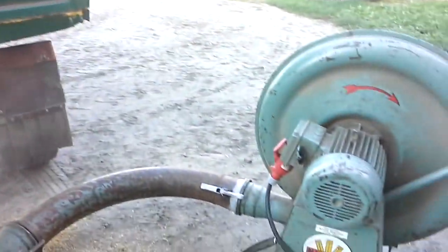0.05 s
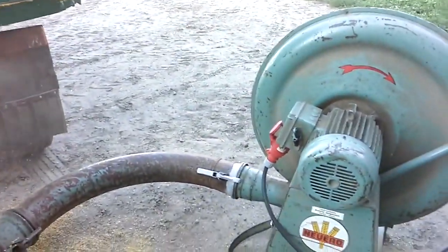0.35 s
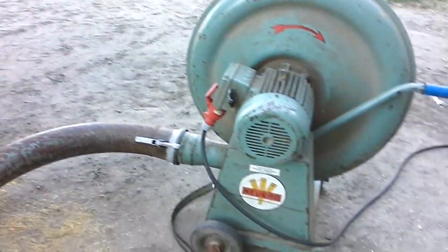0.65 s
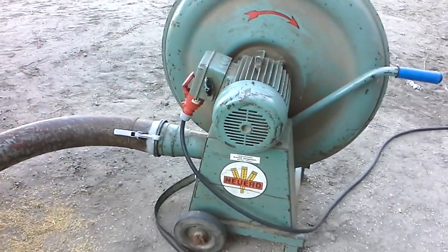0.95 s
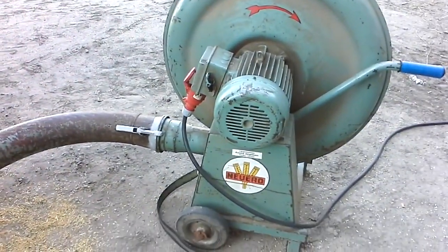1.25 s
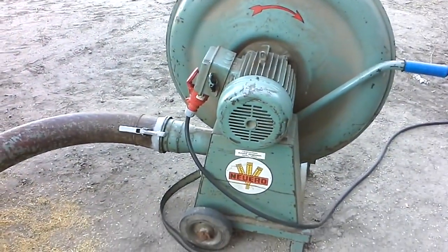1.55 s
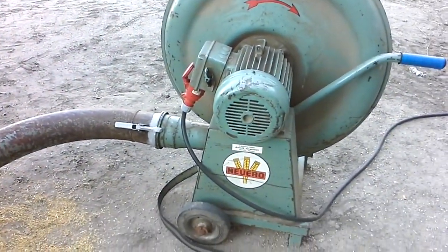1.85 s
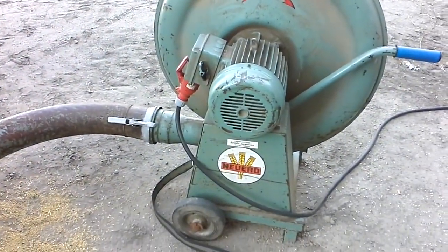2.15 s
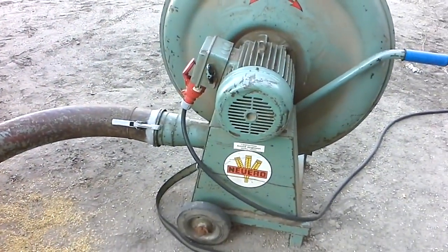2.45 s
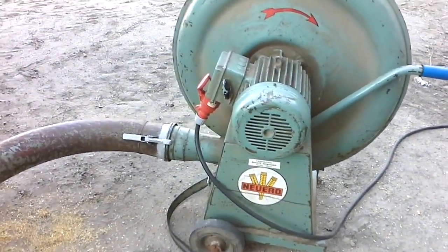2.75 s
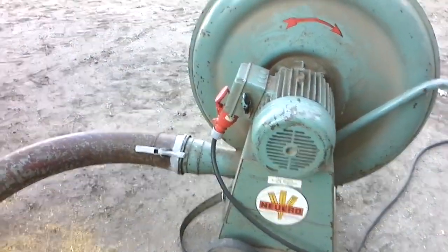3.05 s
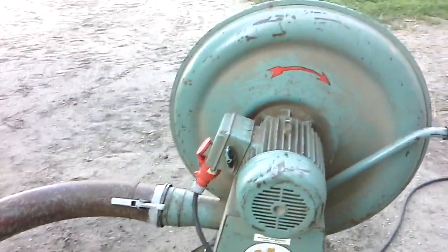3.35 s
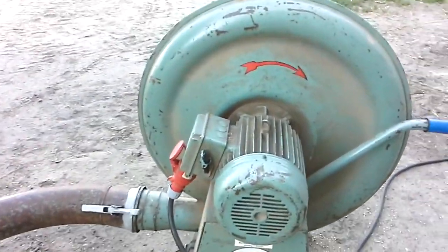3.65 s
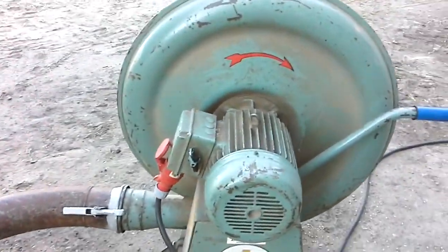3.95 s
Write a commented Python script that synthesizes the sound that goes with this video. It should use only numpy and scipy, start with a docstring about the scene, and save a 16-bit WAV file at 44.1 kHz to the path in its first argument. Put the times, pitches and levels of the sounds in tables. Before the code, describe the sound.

An electric grain blower runs steadily with a shrill whine, low roar and hiss.

```python
"""Grain blower at full speed

Outdoors, an electric grain blower runs close to a hand-held mono microphone. The impeller hums on
multiples of the shaft speed, air roars in the casing and hisses through the steel pipe, whose many narrow
resonances ring as a shrill, restless whine. Near the end the microphone moves in on the motor."""
import sys
import numpy as np
from scipy import signal
from scipy.fft import rfft, irfft, next_fast_len
from scipy.io import wavfile
from scipy.ndimage import uniform_filter1d, map_coordinates

SR = 44100
rng = np.random.default_rng(int(sys.argv[2]) if len(sys.argv) > 2 else 0)


def transcribe(u):
    """Save the signal u as a 16-bit wav file named by the first command-line argument.

    u: samples, shape (n,) or (channels, n), limited to [-1, 1]; the rate is SR.
    q: integer samples, one column per channel.
    """
    v = np.clip(np.atleast_2d(u).T, -1, 1)
    q = np.round(v * 32767).astype(np.int16)
    wavfile.write(sys.argv[1], SR, q)


N = 176400
TIME_S = np.arange(N) / SR


def amp(db):
    """Decibels to gain."""
    return 10 ** (np.asarray(db) / 20)


def unit_rms(x):
    """Scale to rms 1."""
    return x / np.sqrt(np.mean(x ** 2) + 1e-20)


def wobble(rate_hz):
    """A smooth random curve through rate_hz knots a second."""
    return map_coordinates(rng.standard_normal(400), [TIME_S * rate_hz], mode="wrap")


def filtered(x, response):
    """Filter x by a gain given as a function of frequency."""
    size = next_fast_len(N + SR // 4)
    freq_hz = np.fft.rfftfreq(size, 1 / SR)
    return irfft(rfft(x, size) * response(freq_hz), size)[..., :N]


def rushing_air(spectrum, patchy_db):
    """Noise shaped to a spectrum, its level uneven in small patches of time and frequency."""
    bins = signal.stft(rng.standard_normal(N), nperseg=512)[2]
    patches = uniform_filter1d(rng.standard_normal(bins.shape), size=6, axis=0)
    patches = uniform_filter1d(patches, size=14, axis=1)
    noise = signal.istft(bins * amp(patchy_db * unit_rms(patches)), nperseg=512)[1][:N]
    freq_hz, density_db = np.transpose(spectrum)
    shaped = filtered(noise, lambda hz: amp(np.interp(np.log(hz + 1), np.log(freq_hz + 1), density_db)))
    return np.sqrt(SR / 2) * shaped


# Tones of motor and impeller, from beside the blower: shaft_multiple, level_db
HUM_TONES = [(4, -46), (5, -35.5), (6, -35.5), (7, -33.5), (12, -32.5), (13, -45), (15, -40), (11, -44),
             (20, -44.5), (24, -43.5), (28, -45.5), (30, -39), (36, -55)]

def impeller_hum(shaft_hz=48.5, speed_wander=0.00047, flutter_db=1.5):
    """Motor and impeller tones locked to the shaft, each fluttering in the turbulent air."""
    speed_hz = shaft_hz * (1 + speed_wander * wobble(rate_hz=2.955))
    turns = np.cumsum(speed_hz) / SR
    hum = np.zeros(N)
    for shaft_multiple, level_db in HUM_TONES:
        peak = np.sqrt(2) * amp(level_db + flutter_db * wobble(rate_hz=7.07))
        hum += peak * np.sin(2 * np.pi * (shaft_multiple * turns + rng.random()))
    return hum


# Narrow resonances of pipe and casing: pitch_hz, width_hz, level_db, change_at_motor_db
PIPE_RESONANCES = [(3090, 25, -40, 0), (3165, 30, -39, 0), (3760, 40, -38, 0), (3978, 18, -35.5, 0),
                   (4135, 13, -25, 1), (4232, 8, -21.3, -6), (4281, 20, -25.2, -1), (4346, 28, -26.7, 0),
                   (4445, 18, -25.5, 0), (4573, 14, -29.7, 0), (4727, 14, -27.3, -3), (4905, 30, -34.5, 0),
                   (5113, 14, -36, 0), (5346, 11, -30.5, 8), (5475, 9, -22.3, -13), (5528, 24, -28.5, -4),
                   (5595, 20, -34, 0), (5678, 14, -34.5, 2), (5793, 14, -33, -5), (5925, 18, -40, 0),
                   (6078, 18, -37.5, 0), (6262, 30, -36.5, 0), (6680, 40, -37, 0), (6745, 16, -34.5, 5),
                   (6892, 14, -32, -7), (6938, 18, -33.5, -4), (7190, 25, -40, 0), (8460, 50, -37, -3),
                   (10210, 40, -39, 0)]
# Slow swell of the upper whine at the microphone: time_s, gain_db
UPPER_SWELL = [(0, 0), (.9, 0), (1.3, 1), (1.7, 0.5), (2.2, 0.5), (2.45, 1.5), (2.95, 2.5), (3.2, 2.5),
               (4, 0)]

def pipe_whine(closeness, upper_from_hz=5200):
    """The flow drives every resonance at random; the microphone's position sets how loud each is."""
    freq_hz = np.fft.rfftfreq(N, 1 / SR)
    swell_db = np.interp(TIME_S, *np.transpose(UPPER_SWELL))
    whine = np.zeros(N)
    for pitch_hz, width_hz, level_db, change_at_motor_db in PIPE_RESONANCES:
        drive = np.exp(2j * np.pi * rng.random(len(freq_hz)))
        resonance = freq_hz * width_hz / (pitch_hz ** 2 - freq_hz ** 2 + 1j * freq_hz * width_hz)
        skirt_taper = 1 / (1 + ((freq_hz - pitch_hz) / (10 * width_hz)) ** 2)
        ring = unit_rms(irfft(drive * resonance * skirt_taper, N))
        heard_db = level_db + change_at_motor_db * closeness + swell_db * (pitch_hz > upper_from_hz)
        whine += amp(heard_db) * ring
    return whine


# Turbulence in the casing, from beside the blower: freq_hz, density_db (power per Hz)
CASING_SPECTRUM = [(20, -97), (60, -93), (85, -84), (112, -92), (140, -75), (170, -66), (195, -55.5),
                   (228, -53.5), (258, -46.5), (330, -46.5), (370, -53.5), (460, -58), (530, -56.5),
                   (620, -57), (720, -59), (820, -65), (1200, -65), (3000, -100)]

def casing_roar(closeness, change_at_motor_db=3):
    """Turbulent air in the casing: a low, slightly unsteady roar, louder close to the motor."""
    roar = rushing_air(CASING_SPECTRUM, patchy_db=1.02)
    return roar * amp(change_at_motor_db * closeness + 0.56 * wobble(rate_hz=12))


# Air in the steel pipe, from beside the blower: freq_hz, density_db (power per Hz)
PIPE_SPECTRUM = [(200, -110), (820, -67), (1150, -58.5), (1600, -58), (2100, -56.5), (2500, -57.5),
                 (3500, -54.5), (3900, -51), (4300, -47), (4700, -48), (5100, -51), (5500, -52.5),
                 (6000, -55.5), (7000, -56.5), (8000, -57.5), (9300, -59), (10500, -57), (11900, -59.5),
                 (13300, -58.5), (14400, -59)]

def pipe_hiss(closeness, change_at_motor_db=0.7, turn_s=0.34, turned_away_db=-2.5):
    """Air rushes through the pipe; its hiss grows at first as the microphone turns to the blower."""
    hiss = rushing_air(PIPE_SPECTRUM, patchy_db=1.0)
    turned_away = np.clip(1 - TIME_S / turn_s, 0, 1)
    position_db = change_at_motor_db * closeness + turned_away_db * turned_away
    return hiss * amp(position_db + 0.4 * wobble(rate_hz=15))


# Path of the hand-held microphone: time_s, closeness (0 beside the blower, 1 close on the motor)
MICROPHONE_PATH = [(0, 0), (2.9, 0), (3.35, 0.63), (3.55, 0.56), (4, 1)]

def scene():
    """The whole blower at one close microphone, the same in both channels."""
    closeness = np.interp(TIME_S, *np.transpose(MICROPHONE_PATH))
    blower = impeller_hum() + pipe_whine(closeness) + casing_roar(closeness) + pipe_hiss(closeness)
    return np.array([blower, blower])


def record(dry):
    """The recorder clips any peak over full scale and keeps nothing above its band limit."""
    return filtered(np.clip(dry, -1, 1), lambda hz: hz < 14560)


dry = scene()
out = record(dry)
transcribe(out)
```